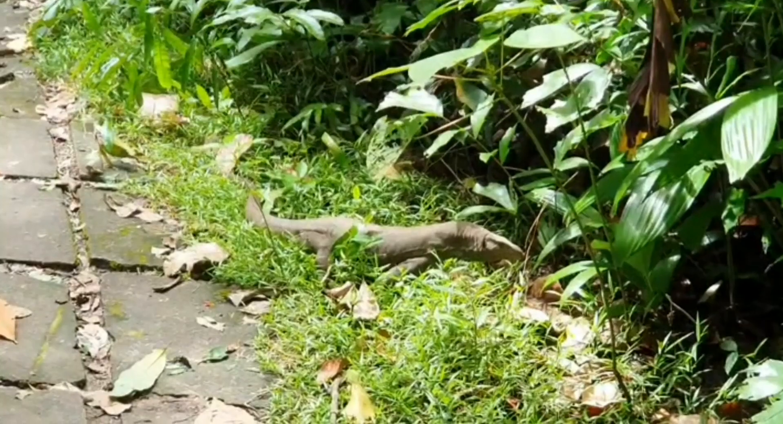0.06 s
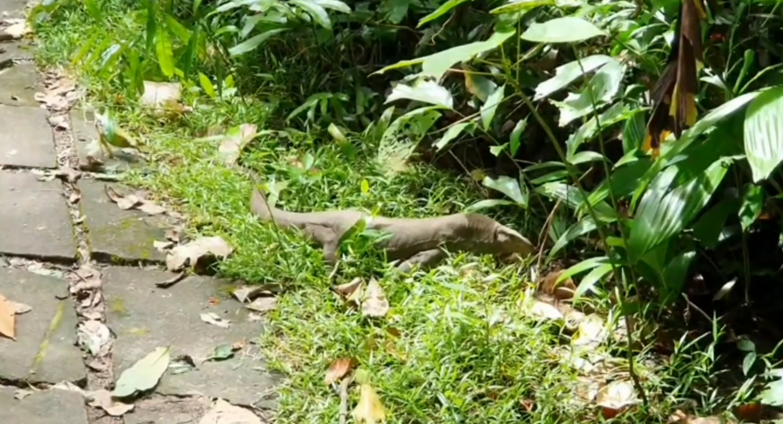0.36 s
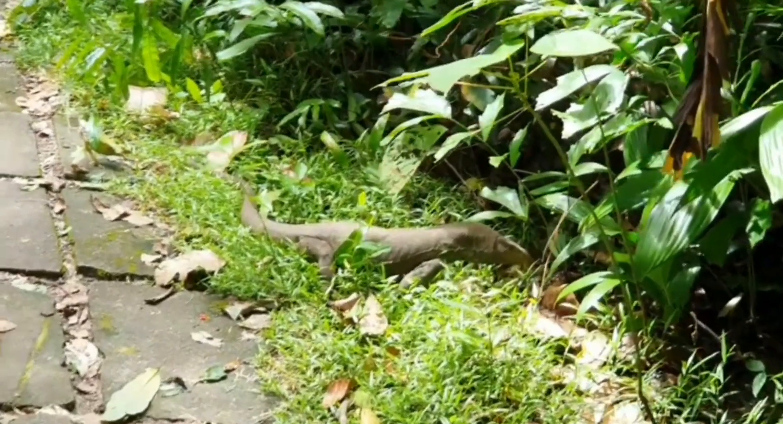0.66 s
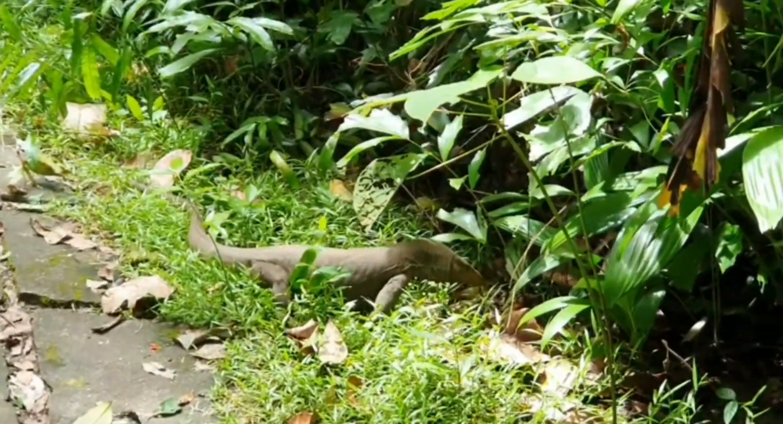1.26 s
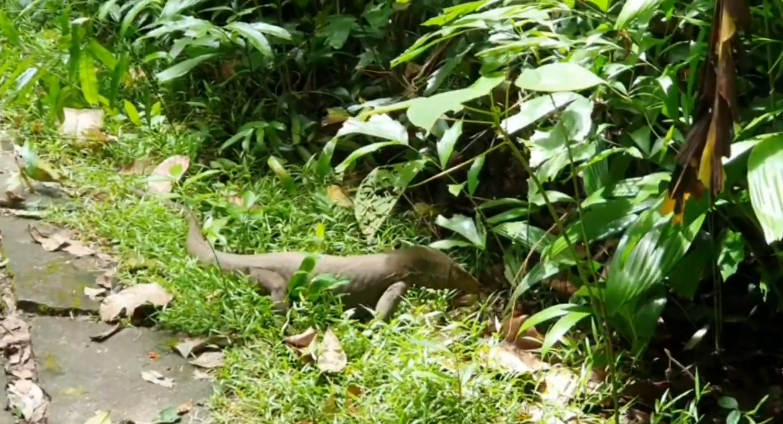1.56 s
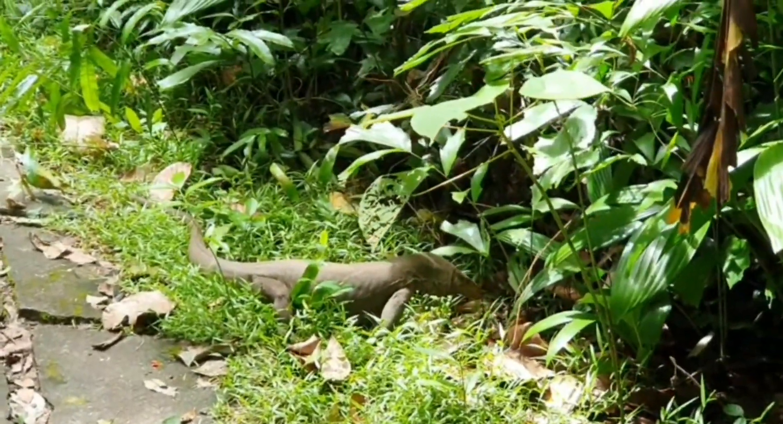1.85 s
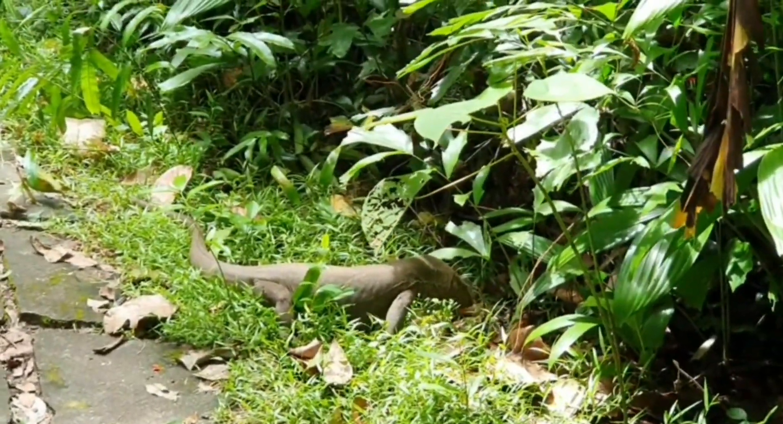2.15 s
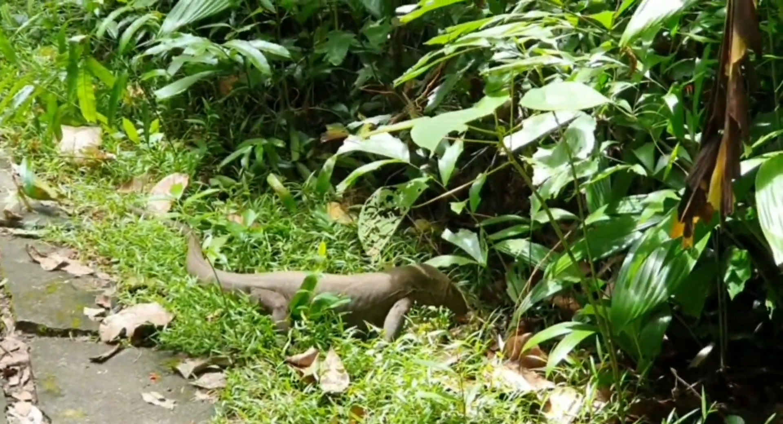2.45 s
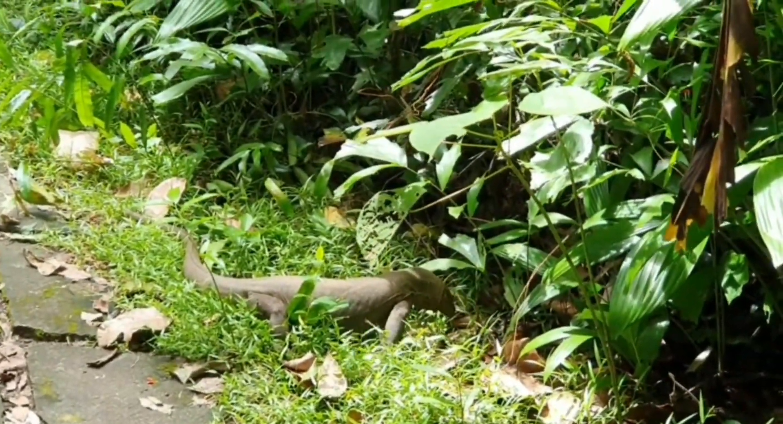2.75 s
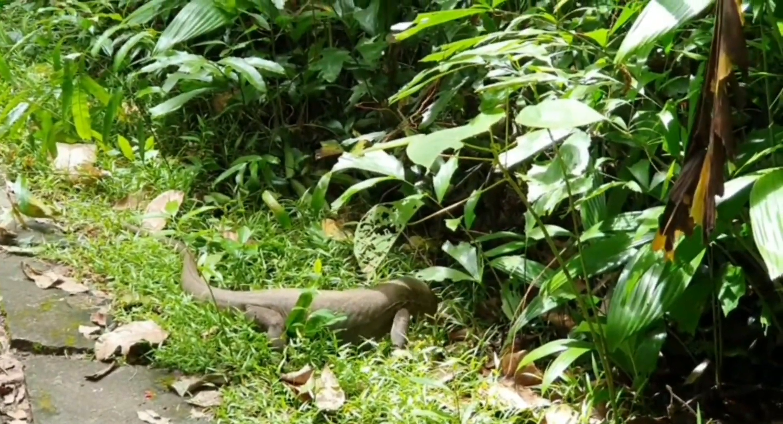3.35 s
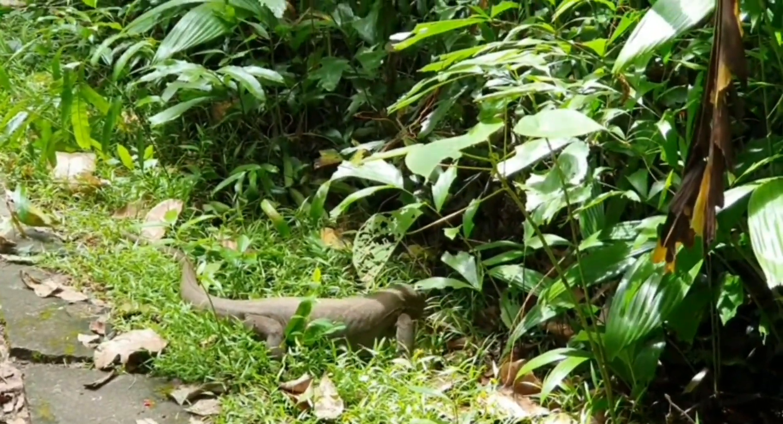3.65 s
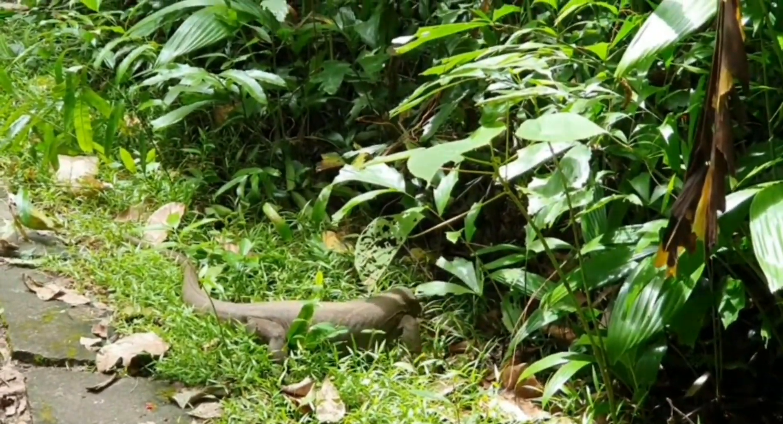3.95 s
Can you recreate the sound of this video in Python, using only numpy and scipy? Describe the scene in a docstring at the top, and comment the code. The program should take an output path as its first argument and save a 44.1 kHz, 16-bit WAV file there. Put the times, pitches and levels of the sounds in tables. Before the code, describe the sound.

Shrill, buzzing drone of a cicada-like insect, pulsing in quick repeated phrases over faint forest air.

```python
"""A cicada-like insect drones at a forest edge. Its shrill tone, a phase-modulated carrier, steps down
in pitch and jumps back up about two and a half times a second. A rough whine two octaves below,
a harmonic series under pulsed amplitude modulation, sputters in bursts and at moments rings clear.
A low rattle, a filtered impulse train, swells where the whine falters; dry ticks gather over
the faint broadband noise of forest air."""
import sys
import numpy as np
from scipy import signal
from scipy.fft import rfft, irfft
from scipy.io import wavfile
from scipy.ndimage import uniform_filter1d

SR = 44100
rng = np.random.default_rng(int(sys.argv[2]) if len(sys.argv) > 2 else 0)


def generate_wav(sig):
    """Save sig (samples, or channels by samples) to the path in sys.argv[1] as 16-bit PCM at SR."""
    pcm = np.round(np.clip(np.atleast_2d(sig).T, -1, 1) * 32767).astype(np.int16)
    wavfile.write(sys.argv[1], SR, pcm)


N = 176400
T = np.arange(N) / SR


# Phrases of three falling notes: first onset t/s, second t/s, third t/s, top f/Hz, bottom f/Hz
SONG = [(.26, .37, .53, 9390, 8980), (.68, .81, .94, 9420, 9010), (1.12, 1.22, 1.38, 9415, 9040),
        (1.52, 1.65, 1.77, 9400, 9020), (1.92, 2.03, 2.14, 9360, 9040), (2.3, 2.42, 2.52, 9345, 9070),
        (2.68, 2.81, 2.94, 9330, 9060), (3.04, 3.17, 3.28, 9340, 9070), (3.41, 3.52, 3.58, 9275, 9110),
        (3.66, 3.75, 3.82, 9260, 9130)]
def song_phase():
    """Phase is the integral of frequency: sagging notes, divided by four to give the whine's phase."""
    opening_hz, middle_hz, sag_hz_per_s, hesitation_s = 9008, 9165, 252, .014
    notes = [(0, opening_hz)]
    for first, second, third, top_hz, bottom_hz in SONG:
        notes += [(first, top_hz), (second, middle_hz), (third, bottom_hz)]
    starts, hz = np.transpose(notes)
    middles = (starts + np.r_[starts[1:], N / SR]) / 2
    wavering_time = abs(T + hesitation_s * wander(hz=68))  # pitch flickers at each change of note
    note = np.searchsorted(starts, wavering_time, "right") - 1
    pitch = hz[note] - sag_hz_per_s * (T - middles[note]) + 14 * wander(hz=55.6)
    return 2 * np.pi * np.cumsum(pitch) / SR / 4


def phrase_accents(delay_s, width_s):
    """A Gaussian envelope marks each upward jump of the song."""
    return sum(np.exp(-((T - onset - delay_s) / width_s) ** 2) for onset, *_ in SONG)


def shrill_tone(phase, envelope, rattling):
    """Phase modulation spreads the fourth harmonic into sidebands: it shakes and slips in the bursts."""
    slip_rad, slip_s = 0.82, 0.0036
    strain = (1 + 1.4 * phrase_accents(delay_s=0, width_s=0.022)) * amp(6.5 * np.tanh(wander(hz=16)))
    slips_per_s = 220 * envelope * strain
    t = np.arange(0, .01, 1 / SR)
    bump = np.exp(-(2 * (t - t.mean()) / slip_s) ** 2)
    slips = signal.oaconvolve(1. * (rng.random(N) < slips_per_s / SR), bump, "same")
    lag = slip_rad * np.cumsum(slips) / bump.sum()
    lag -= uniform_filter1d(lag, size=900, mode="nearest")  # preserves the mean pitch
    shake = 0.21 * envelope * wander(hz=306) + 0.11 * unit(rattling) - lag
    shake += .8 * uniform_filter1d(envelope, size=800) * wander(hz=45)
    return amp(-51.5) * unit(np.cos(4 * phase + shake) / (1 + 0.2 * slips))


def undertone(phase, envelope, offset_hz=298):
    """Beating: a weaker tone comes and goes just below the shrill one and interferes with it."""
    flicker = amp(15 * np.tanh(wander(hz=13)))
    tone = np.cos(4 * phase - 2 * np.pi * offset_hz * T + .9 * wander(hz=50))
    return amp(-60) * unit(np.sqrt(envelope) * flicker * tone)


# Falters: centre t/s, duration/s, nominal rise of the rattle/dB, nominal drop of the whine/dB
FALTER_EVENTS = [(.335, 0.042, -23, 4), (0.454, 0.015, 3.5, -2), (0.49, .02, -2.5, 4),
                 (0.577, 0.046, 3.5, 1), (0.609, 0.0093, 1, 10), (0.717, 0.022, 7.5, -6.5),
                 (.89, 0.03, 8, 36), (1.012, .06, 6, 5.5), (1.14, 0.045, 6, 0.5), (1.417, 0.066, 7, -0.5),
                 (1.447, 0.04, -2.5, 2.5), (1.55, 0.038, 9.5, -1), (1.705, 0.067, 1.5, 7.5),
                 (1.797, 0.012, 7, -1), (1.87, 0.06, 4.5, 2.5), (2.092, 0.019, 6, 14),
                 (2.236, 0.065, 0.5, 9.5), (2.329, 0.041, 8.5, 2), (2.455, 0.04, 4.5, 12.5),
                 (2.638, 0.036, -1, 5.5), (2.719, 0.034, 4.5, 4), (2.857, 0.013, 10, 13),
                 (2.926, 0.041, 3.5, 13), (3., 0.017, 4, 9), (3.08, 0.02, 4.5, 6), (3.15, 0.039, 5.5, 3.5),
                 (3.263, .04, 6, 10.5), (3.36, 0.043, 7, 12), (3.5, 0.027, 7, -3), (3.578, .05, 1.5, 10.5),
                 (3.795, 0.029, 4.5, 5)]
def faltering():
    """Levels in decibels add: bell-shaped changes combine into gains for the rattle and the whine."""
    rise_db, drop_db = np.zeros((2, N))
    for centre, duration, up_db, down_db in FALTER_EVENTS:
        bell = np.exp(-abs(2 * (T - centre) / duration) ** 3)
        rise_db += up_db * bell
        drop_db += down_db * bell
    return amp(rise_db), amp(-drop_db)


def sputter(burst, strength, pulses_per_s=300, depth=0.82, ceiling=2.98):
    """Amplitude modulation of the whine: uneven pulses swell on each top note and saturate softly."""
    cycles = np.cumsum(pulses_per_s * (1 + .3 * wander(hz=117.5))) / SR
    pulses = np.maximum(1 + depth * np.cos(2 * np.pi * cycles), 0)
    swell = phrase_accents(delay_s=0.031, width_s=0.043)
    drive = amp(5 * burst + 3.5 * wander(hz=34.5) + 4 * swell)
    return unit(np.tanh(drive * pulses * np.sqrt(strength) / ceiling) * np.sqrt(strength))


# Partials of the whine: harmonic number, level/dB, scale of the phase noise/rad
WHINE_HARMONICS = [(1, -47.5, 0.59), (2, -62, 0.6), (3, -67, 0.41), (5, -71, .8), (6, -76, 1),
                   (7, -58, 0.66)]
def whine(phase, envelope):
    """A harmonic series whose spectral lines are broadened by partly shared phase noise."""
    shared_shake = wander(hz=107)
    tones = np.zeros(N)
    for harmonic, db, blur in WHINE_HARMONICS:
        shake = blur * (shared_shake + .5 * wander(hz=280))
        tones += amp(db) * unit(envelope * np.cos(round(harmonic) * phase + shake))
    return tones


# Moments when the whine rings clear: centre t/s, duration/s, peak level/dB
CLEAR_MOMENTS = [(0.302, 0.046, -41), (0.532, 0.017, -37.5), (.672, 0.013, -40), (0.722, 0.074, -48),
                 (1.12, .04, -42.5), (1.212, 0.0088, -38.5), (1.566, .016, -42), (1.944, 0.043, -40),
                 (2.016, 0.0092, -42), (2.06, 0.014, -38.5), (2.147, 0.015, -38.5), (2.18, 0.0053, -36.5),
                 (2.388, .03, -42.5), (2.564, 0.019, -37), (2.782, 0.033, -39.5), (3.127, 0.019, -37.5),
                 (3.238, 0.0057, -37.5), (3.46, 0.036, -44), (3.684, 0.027, -37), (3.757, 0.0059, -35),
                 (3.913, 0.011, -42), (3.981, 0.011, -39)]
def clear_rings(phase):
    """Gating of a fundamental and its octave; returns the sound and how far the gates are open (0-1)."""
    envelope, openness = np.zeros((2, N))
    for centre, duration, db in CLEAR_MOMENTS:
        gate = np.exp(-(2 * (T - centre) / duration) ** 4)
        envelope += amp(db) * gate
        openness += gate
    tone = np.cos(phase) + amp(-17.5) * np.cos(2 * phase)
    return envelope * tone, np.minimum(openness, 1)


# Spectral density of the rasp: f/Hz, relative level/dB
RASP_SPECTRUM = [(900, -28.5), (1500, -10), (1950, -4.5), (2280, 2.5), (2650, -10), (3300, -15.5),
                 (4100, -20.5), (4550, -11.5), (5400, -22.5), (6500, -14.5), (7600, -29.5), (8400, -11.5),
                 (8800, -4), (9500, -19), (10500, -26), (15500, -20.5)]
def rasp(envelope, strength):
    """Source and filter: noise follows the bursts of the whine and is shaped into spectral peaks."""
    noise = rng.standard_normal(N) * envelope ** 0.33 * strength ** 0.88
    return amp(-50) * unit(colour(noise, RASP_SPECTRUM))


# Spectral densities of the dull rattle and of its hollow knock: f/Hz, relative level/dB
RATTLE_SPECTRUM = [(20, -47), (45, 0), (110, 6), (160, -2.5), (310, -1), (450, -6), (650, -7.5),
                   (1000, -13), (1600, -11.5), (2800, -19.5), (4200, -24), (15000, -47)]
KNOCK_SPECTRUM = [(20, -37), (100, -23.5), (200, -1), (310, 9.5), (420, -5.5), (620, -7.5), (1000, -30),
                  (3000, -36), (15000, -73)]
def rattle(burst, rise, strength, hits_per_s=280):
    """Impulse excitation: uneven hits rattle between bursts and sound a hollow resonance in falters."""
    cycles = np.cumsum(hits_per_s * np.exp(.4 * wander(hz=198.5))) / SR
    hits = np.diff(np.floor(cycles), prepend=0) * rng.choice([-1, 1], N)
    hits *= amp(4.5 * rng.uniform(-0.66, 1, N) - 2.65 * np.tanh(burst))
    dull = colour(hits * rise ** 2.3, RATTLE_SPECTRUM) / np.std(colour(hits, RATTLE_SPECTRUM))
    knock = colour(hits * rise * (1 - strength), KNOCK_SPECTRUM) / np.std(colour(hits, KNOCK_SPECTRUM))
    ceiling = amp(-36.5)
    return ceiling * np.tanh(amp(-57) * (dull + knock) / ceiling)


# Spectral density of a dry, low tick: f/Hz, relative level/dB
TICK_SPECTRUM = [(20, -37), (70, -7), (130, 2), (200, -2.5), (300, 1.5), (540, -5), (800, -11.5),
                 (1300, -18.5), (2500, -25), (5000, -45), (15000, -66)]
def ticks(growth_per_s2=18):
    """A Poisson process: independent ticks arrive at a rate that grows linearly with time."""
    hits = (rng.random(N) < growth_per_s2 * T / SR) * rng.choice([-1, 1], N)
    gains = amp(2.5 * rng.uniform(-1.1, 1, N))
    return amp(-55) * unit(colour(hits * gains, TICK_SPECTRUM))


# Spectral density of the forest air: f/Hz, relative level/dB
AIR_SPECTRUM = [(20, -28), (50, -15), (115, -10), (200, 9), (600, -10), (1200, -15), (2400, -10),
                (3700, -22), (6500, -20), (7600, -22), (9100, -13), (10500, -22), (12700, -24),
                (14500, -20), (15400, -15)]
def forest_air():
    """Stationary Gaussian noise, filtered to a faint, low wash."""
    return amp(-58) * unit(colour(rng.standard_normal(N), AIR_SPECTRUM))


def amp(db):
    """Amplitude ratio of a level in decibels."""
    return 10 ** (np.asarray(db) / 20)


def unit(x):
    """Normalisation to rms 1."""
    return x / np.sqrt(np.mean(abs(x) ** 2) + 1e-20)


def wander(hz):
    """Low-pass noise: random motion of rms 1, up to about hz."""
    f = np.fft.rfftfreq(N, 1 / SR)
    return unit(irfft(rfft(rng.standard_normal(N)) / (1 + (f / hz) ** 2), N))


def colour(x, spectrum):
    """Causal filtering: the phase response follows from the log gain by the Hilbert transform."""
    hz, db = np.transpose(spectrum)
    f = abs(np.fft.fftfreq(4096, 1 / SR))
    log_gain = np.log(amp(np.interp(np.log(f + 1), np.log(hz), db)))
    taps = np.fft.ifft(np.exp(signal.hilbert(log_gain).conj())).real
    return signal.oaconvolve(x, taps[:len(taps) // 2])[:N]


def scene():
    """Superposition: the insect's tones, locked to one phase, add to its rattle, the ticks and the air."""
    phase, burst = song_phase(), wander(hz=138)
    rise, strength = faltering()
    envelope = sputter(burst, strength)
    rattling = rattle(burst, rise, strength)
    rings, clarity = clear_rings(phase)
    rough = whine(phase, envelope * (1 - 0.41 * clarity)) + rasp(envelope, strength)
    air = forest_air()
    shrill = shrill_tone(phase, envelope, rattling) + undertone(phase, envelope)
    return (shrill + rough + rings + rattling + ticks() + air)[None]


# Opening fade: t/s, level/dB
FADE_IN = [(.105, -85), (.114, -27), (.145, -11), (.2, -9), (.27, -3.5), (.42, 1)]
def record(dry, cutoff_hz=15550):
    """A gain envelope fades the sound in; a low-pass filter limits its bandwidth."""
    faded = dry * amp(np.interp(T, *np.transpose(FADE_IN)))
    lowpass = signal.firwin(1023, cutoff_hz, window=("kaiser", 9), fs=SR)
    return signal.oaconvolve(faded, lowpass[None], "same")


dry = scene()
out = record(dry)
generate_wav(out)
```